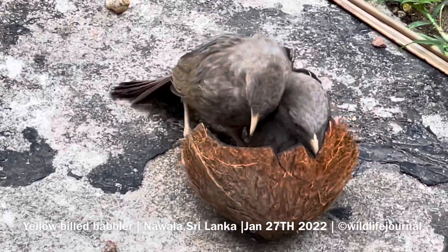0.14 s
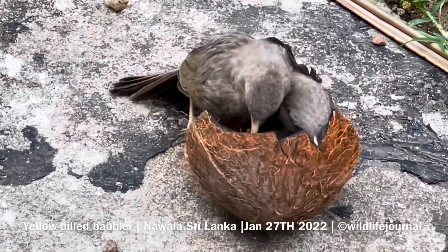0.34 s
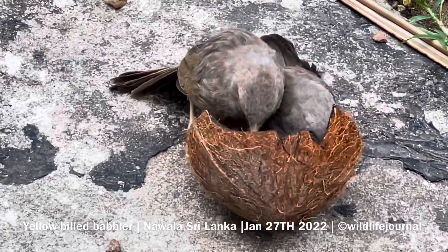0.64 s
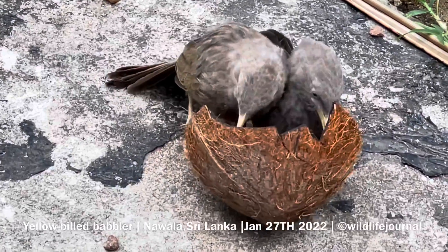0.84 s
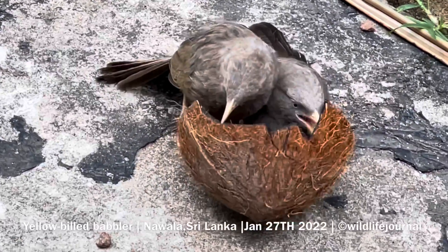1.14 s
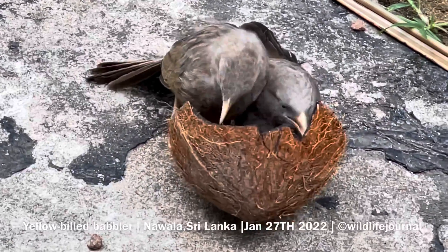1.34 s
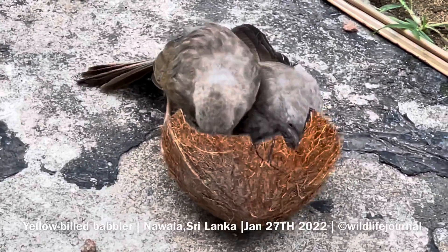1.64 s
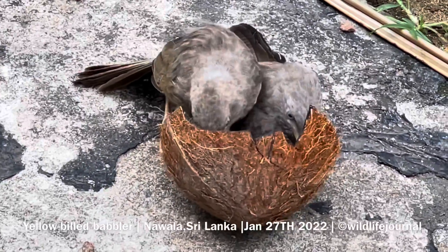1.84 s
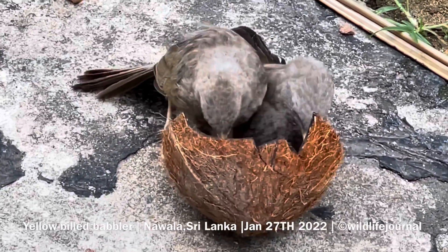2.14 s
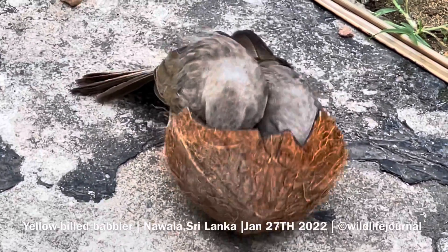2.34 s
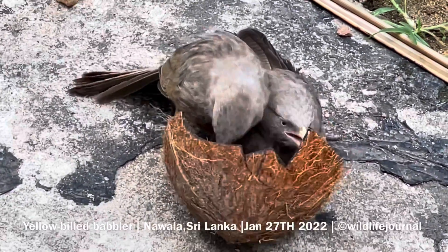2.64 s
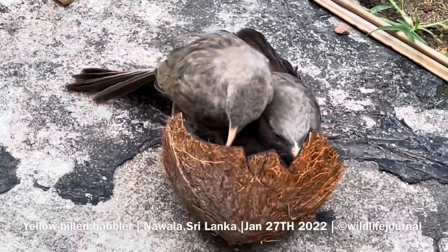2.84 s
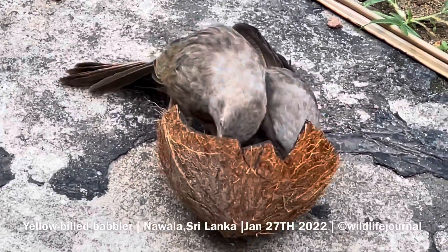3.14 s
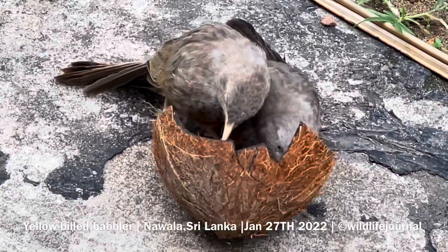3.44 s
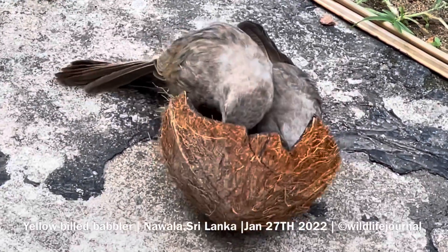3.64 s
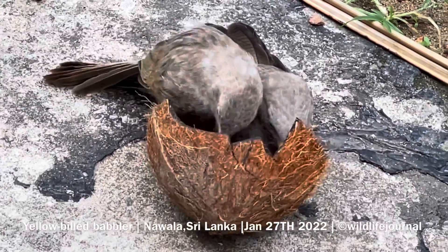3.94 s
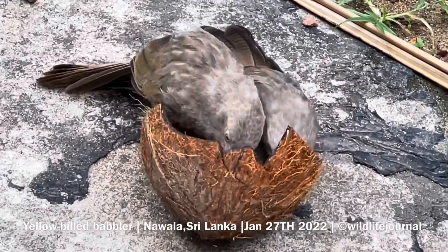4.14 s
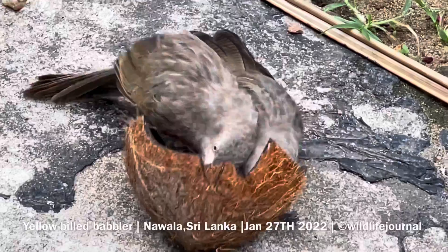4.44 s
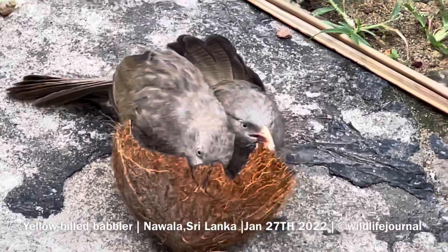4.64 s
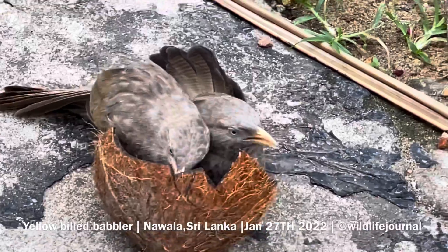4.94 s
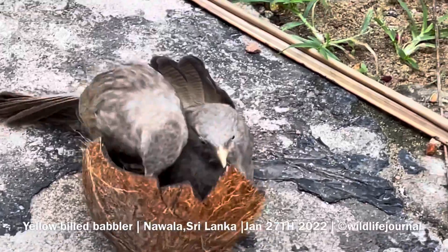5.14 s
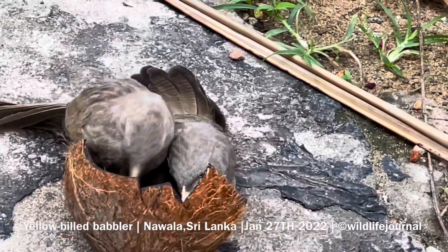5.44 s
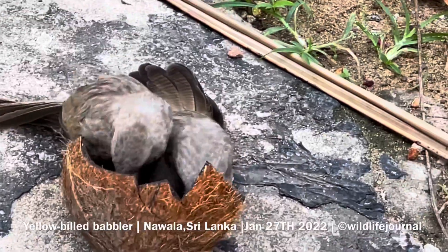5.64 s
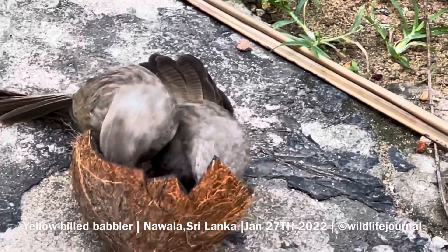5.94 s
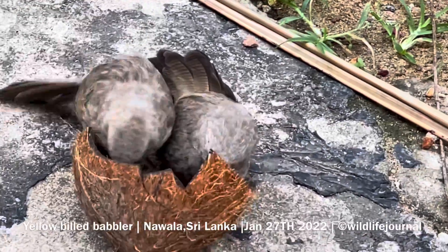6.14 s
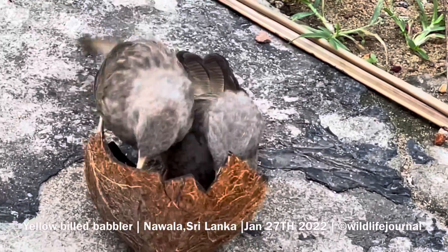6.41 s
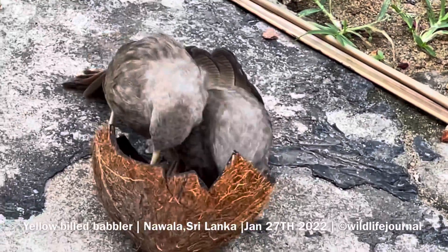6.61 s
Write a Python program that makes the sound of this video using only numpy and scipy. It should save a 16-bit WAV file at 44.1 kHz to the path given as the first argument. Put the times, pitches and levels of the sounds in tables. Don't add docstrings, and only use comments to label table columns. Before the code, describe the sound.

A close stereo outdoor scene in a paved yard, about seven seconds long. Low distant traffic rumbles and hums in soft surges beneath a steady fine hiss of leaves and insects. At 0 to 0.2 seconds a nearby small bird gives brief piercing chirps, with faint hoarse chatter behind. A rough crow caws from the left at 0.7 and 1.4, with short echo. Hollow, dry beak taps on a shell come at 0.9, 1.6 and 2.2 to 2.5, with a crisp gritty tick near 2.55. From 2.7 to 3.2 thin whistles climb, squeak and warble. Single knocks follow at 3.4, 4.1 and 4.4, amid distant bending whistles and husky calls. The loudest near whistle rises at 4.8 and falls sharply by 5.3, two-toned. A third caw comes at 5.6, then a knock at 5.9, small claw scratches around 6.1 to 6.4, and weaker taps at 6.6 and 6.7.

```python
import sys
import numpy as np
from scipy import signal
from scipy.fft import rfft, irfft, next_fast_len
from scipy.io import wavfile

SR = 44100
rng = np.random.default_rng(int(sys.argv[2]) if len(sys.argv) > 2 else 0)


def log_audio(samples):
    frames = np.atleast_2d(samples).T
    limited = np.clip(frames, -1, 1)
    pcm = np.round(limited * 32767).astype(np.int16)
    wavfile.write(sys.argv[1], SR, pcm)


def decibels_to_gain(level_db):
    exponent = np.asarray(level_db, float) / 20
    return 10 ** exponent


N = 298557

# f/Hz, level/dB (per Hz)
TRAFFIC_SPECTRUM = [(14, -46), (24, -9), (54, 1.5), (88, -4), (158, -5.5), (220, -11), (280, -13),
                    (382, -17), (589, -19.5), (665, -23), (819, -22), (1120, -34), (1500, -33.5),
                    (1950, -43), (3300, -120)]
# t/s, rise above the steady hum/dB
HUM_SURGES = [(0.05, 11), (.5, 7), (1.02, 4), (1.45, 8.5), (1.85, 4.5), (2.45, 3), (3.02, 10), (3.45, 8),
              (3.88, -2.5), (4.24, 6), (4.8, 5), (5.4, 6.5), (6.66, 6)]
# f/Hz, level/dB (per Hz)
HISS_SPECTRUM = [(590, -12), (1000, 1), (1170, -4), (2740, -9.5), (5060, -29.5), (5690, -20), (6330, -4.5),
                 (6610, 0.5), (7440, -19.5), (9220, -8), (9830, -6), (10400, -15.5), (10800, -19),
                 (11600, -22.5), (13000, -33), (14500, -55)]
# t/s, level change/dB
BREEZE = [(0, -1.5), (1.9, 2), (2.2, -0.5), (3.0, 3), (3.7, -1), (4.8, -2), (6.3, 0), (6.77, -3)]
# f/Hz, likeness/1
LIKENESS = [(60, 0.93), (130, 0.88), (290, 0.87), (640, 0.27), (1400, 0.27), (3100, 0.94), (6000, 0.996)]
# t/s, f/Hz, level/dB, octave level/dB as the beak opens
UPPER_NOTES = [
    [(0.092, 4040, -47, -71), (0.1, 4180, -42.5, -61), (0.136, 3960, -39, -50.5), (0.152, 3780, -40.5, -48),
     (0.18, 3405, -36.5, -60), (0.214, 3725, -40, -50), (0.23, 3820, -42, -51), (0.237, 3800, -57, -54)],
    [(2.68, 3820, -56, -81), (2.696, 3966, -51, -61), (2.746, 4003, -47, -74), (2.794, 4318, -42, -57),
     (2.834, 4200, -42, -46), (2.86, 4300, -45.5, -38.5), (2.874, 4100, -43, -58), (2.89, 4010, -48, -91)],
    [(3.028, 3770, -42, -59), (3.034, 4055, -49, -54), (3.042, 4013, -42.5, -53), (3.06, 3690, -44, -68),
     (3.074, 3780, -44, -56), (3.098, 4040, -44, -57), (3.106, 3900, -48, -64)],
    [(4.818, 4050, -63, -69), (4.828, 4075, -51.5, -67), (4.86, 4123, -43.5, -50.5),
     (4.872, 4100, -41, -61), (4.91, 4097, -43, -47), (4.958, 4163, -32.5, -49), (5.0, 4386, -32.5, -40),
     (5.012, 4390, -38, -50)],
    [(5.102, 4150, -52, -61), (5.114, 4244, -42.5, -48.5), (5.156, 3960, -35.5, -49.5),
     (5.186, 3843, -32, -49), (5.19, 3797, -35, -53), (5.21, 3740, -32, -55), (5.222, 3810, -33, -68),
     (5.228, 3660, -63, -62)],
]
# t/s, f/Hz, level/dB, octave level/dB
SQUEAKS = [
    [(0.0, 4370, -37, -49), (0.008, 3870, -61, -69), (0.014, 3600, -47, -55)],
    [(2.891, 4840, -46, -46), (2.9, 4680, -61, -44), (2.912, 4490, -53, -48), (2.932, 4430, -46.5, -44),
     (2.941, 4100, -47, -52), (2.95, 3340, -55, -70)],
    [(3.132, 3735, -50, -69), (3.138, 3710, -40.5, -65), (3.147, 3460, -45, -58), (3.153, 3250, -51, -63),
     (3.16, 3450, -51, -64), (3.17, 3550, -52, -73)],
    [(5.0125, 4160, -35, -50), (5.017, 3830, -49.5, -57), (5.023, 3430, -67, -79)],
]
# t/s, f/Hz, level/dB, octave level/dB
LOWER_NOTES = [
    [(0.194, 2370, -58, -104), (0.202, 2478, -43, -77), (0.216, 2463, -47.5, -63), (0.224, 2507, -38, -71),
     (0.228, 2490, -68, -83), (0.234, 2476, -67, -82)],
    [(3.032, 2356, -51, -97), (3.042, 2423, -45.5, -66), (3.056, 2330, -47, -70), (3.066, 2403, -41.5, -69),
     (3.078, 2474, -42.5, -68), (3.092, 2553, -34.5, -56), (3.104, 2527, -36.5, -66),
     (3.114, 2475, -38.5, -49), (3.128, 2570, -30.5, -57), (3.137, 2640, -59, -44)],
    [(5.218, 2560, -72.5, -76), (5.226, 2695, -28, -43), (5.232, 2610, -28, -49.5),
     (5.252, 2575, -30.5, -45), (5.264, 2540, -39, -47.5), (5.272, 2410, -39.5, -58)],
]
# start t/s, end t/s, level/dB
DOUBLING = [(2.685, 2.711, -64), (2.754, 2.806, -53), (2.803, 2.847, -62), (5.166, 5.225, -62.5)]
# upper multiple/1, lower multiple/1, level/dB
MIXED_TONES = [(1, -1, -24), (1, 1, -18), (2, -1, -25), (1, 2, -8), (2, 1, -8), (2, 2, -30), (2, 3, -40)]
# start t/s, crest t/s, end t/s, crest f/Hz, level/dB
FAR_ARCHED = [(1.141, 1.402, 1.49, 3840, -69.5), (2.41, 2.613, 3.14, 3952, -68),
              (5.79, 6, 6.3, 4098, -68.5)]
# t/s, f/Hz, level/dB
FAR_CURVED = [
    [(4.255, 3660, -70), (4.3, 3700, -72.5), (4.36, 3765, -66), (4.43, 3900, -66), (4.51, 4085, -71),
     (4.59, 3560, -61.5), (4.68, 3380, -63), (4.81, 3433, -80)],
    [(4.245, 2950, -66), (4.285, 2465, -61), (4.32, 2324, -62), (4.343, 2350, -66), (4.356, 2380, -70)],
    [(4.59, 2850, -66), (4.63, 2456, -60), (4.662, 2360, -62), (4.682, 2350, -61)],
]
# start t/s, end t/s, first f/Hz, last f/Hz, level/dB
FAR_STRAIGHT = [(0.001, .11, 4610, 4840, -67), (2.76, 2.89, 4800, 4730, -72), (0.292, 0.686, 905, 943, -70),
                (0.619, .72, 3530, 3500, -82), (1.03, 1.143, 3130, 3010, -76),
                (1.129, 1.433, 3006, 2834, -67.5), (1.486, 1.66, 3610, 3566, -68.5),
                (2.76, 2.863, 3570, 3500, -62.5), (3.566, 3.67, 3330, 3360, -68),
                (3.808, 3.83, 2560, 2560, -68), (3.85, 3.895, 2517, 2600, -61),
                (3.923, 4.096, 3058, 3006, -65), (2.455, 2.5, 3130, 3170, -68.5),
                (4.328, 4.39, 2073, 2043, -64), (4.664, 4.73, 2080, 2050, -66),
                (3.678, 3.815, 3870, 3950, -92), (6.164, 6.318, 2210, 2260, -74.5)]
# start t/s, end t/s, centre f/Hz, level/dB
HOARSE_CALLS = [(.122, .16, 2600, -63), (.315, .37, 2660, -63.5), (.47, .5, 2203, -67.5),
                (1.82, 1.87, 4240, -74), (1.87, 1.936, 2555, -66.5), (2.44, 2.637, 1636, -71),
                (3.44, 3.67, 2745, -69), (3.91, 4.12, 2775, -77), (4.12, 4.25, 2914, -79.5),
                (2.46, 2.52, 2780, -76), (6.7, 6.76, 2510, -83), (4.26, 4.332, 2750, -72),
                (4.59, 4.66, 2810, -71), (4.686, 4.725, 2795, -63.5), (5.0, 5.015, 2760, -70.5),
                (1.08, 1.4, 3040, -79.5), (6.05, 6.237, 4500, -79.5), (6.2, 6.4, 1603, -76)]
# start t/s, end t/s, centre f/Hz, level/dB
HUSKY_CALLS = [(0.0, 0.037, 9280, -61), (0.002, .03, 4250, -60.5), (.125, .16, 2030, -67),
               (.165, .2, 1795, -69), (.46, .6, 4720, -81), (.62, .7, 1636, -76), (2.471, 2.62, 4670, -97),
               (2.801, 2.826, 2238, -56), (2.83, 3.025, 2250, -69.5), (3, 2.98, 4421, -62),
               (3.134, 3.16, 2880, -63), (3.136, 3.2, 3330, -66), (3.14, 3.152, 2004, -61.5),
               (3.28, 3.39, 1903, -73), (3.36, 3.42, 2720, -77.5), (3.461, 3.62, 8900, -75.5),
               (3.471, 3.6, 2380, -69.5), (3.506, 3.6, 3320, -65), (3.911, 4.09, 2700, -67.5),
               (3.931, 4.1, 6160, -79.5), (3.932, 4.1, 9180, -74.5), (4.101, 4.24, 2980, -79),
               (4.171, 4.25, 4740, -91.5), (5.62, 5.86, 4190, -69.5)]
# start t/s, length t/s, breath level/dB
CAWS = [(0.714, 0.31, -55.5), (1.389, 0.28, -56.5), (5.6, .3, -57)]
# f/Hz, flutter f/Hz, loss on the right/dB of lower and of upper resonance, rasp share/1
CAW_VOICES = [(474.5, 88, 10, 3, .7), (475.5, 87, 17, 3, .55), (470, 85, 7, 1, .95)]
# t/s, level/dB, upper resonance against lower/dB as the beak moves
CAW_EFFORTS = [
    [(0.715, -68, -13), (0.741, -43.5, -16), (0.781, -38.5, -4.5), (0.849, -36.5, -6), (0.865, -42, -1),
     (0.883, -37.5, 3), (0.917, -35.5, -7), (1.01, -54, 5)],
    [(1.395, -62, -7), (1.415, -46.5, -16), (1.439, -42.5, -3.5), (1.481, -32, -13.5), (1.501, -47, -4),
     (1.519, -31, -10), (1.575, -36, -15), (1.623, -36, -11), (1.65, -55.5, -4), (1.68, -39, -1)],
    [(5.605, -83, -15), (5.619, -51, -13), (5.649, -42.5, -4), (5.675, -40.5, -6), (5.771, -39.5, -3),
     (5.785, -49.5, 6), (5.827, -38, -2.5), (5.895, -58, 2.5)],
]
# t/s after its start, level/dB
CAW_ONSET = [(0, -32), (.032, -7), (.078, 1.5)]
# t/s before its end, level/dB
CAW_RELEASE = [(0.082, 2.5), (0.00084, -8.5)]
# f/Hz, level/dB (per Hz)
THROAT_SPECTRUM = [(350, -65), (600, -47), (735, -14), (922, -14), (1030, -9.5), (1170, -3.5), (1440, -1),
                   (1650, 3.5), (1920, 0.5), (2100, 3.5), (2520, -32), (3270, -44), (3580, -50),
                   (4500, -53), (5850, -69), (9900, -120)]
# f/Hz, level/dB (per Hz)
BREATH_SPECTRUM = [(1530, -17), (2600, -3.5), (3270, -12.5), (3720, -10), (4000, -4.5), (8450, -5),
                   (10200, -12), (11300, -5), (12100, -21), (13000, -55)]
# t/s, peak level/dB, f/Hz, left against right/dB
KNOCKS = [(0.939, -40, 800, 1), (1.315, -54.5, 580, -15), (1.613, -45, 1120, -8), (1.877, -51, 800, -2),
          (1.965, -50, 850, 0), (2.495, -51, 744, -1), (2.225, -40.5, 850, 0), (2.451, -40, 716, -1.0),
          (2.516, -51.5, 690, -2), (3.428, -42, 890, 0), (4.079, -41.5, 895, 0), (4.378, -38.5, 910, 1),
          (5.945, -40, 1050, 1), (6.574, -45, 850, 0), (6.73, -50, 800, 1)]
# t/s, peak level/dB, dull part level/dB, decay by 60 dB t/s
TICKS = [(1.322, -54, -60, .02), (1.984, -51, -65, 0.022), (2.229, -49, -57, 0.027),
         (2.255, -47, -50.5, 0.013), (2.269, -44, -47, 0.015), (2.552, -31, -62, 0.02),
         (2.554, -45, -60.5, 0.15), (2.36, -55, -70, .015), (2.57, -45, -66, .02), (2.892, -65, -48, .008),
         (3.134, -68, -43.5, 0.011), (3.6, -68, -63, .015), (4.195, -70, -66, .015), (3.52, -62, -61, 0.05),
         (5.222, -57, -41, 0.013), (5.242, -35, -49, 0.021), (5.946, -57, -57, 0.013),
         (6.088, -43.5, -55.5, 0.11), (6.145, -44, -67, 0.017), (6.185, -42, -62, 0.013),
         (6.234, -49, -75, 0.043), (6.395, -56, -67, 0.023)]
# f/Hz, left lead/rad
PORT_PHASE = [(250, .15), (1500, .45), (5100, .5), (5800, 0), (7100, 0), (7800, .5), (8300, .4), (8600, 0),
              (9700, -2.5), (10300, -3.14), (10900, -3.9), (11700, -6.28), (12250, -6.28), (12700, -7.8)]
# f/Hz, level/dB
MICROPHONE = [(9500, -0.5), (10200, -5.5), (11000, 1.5), (12600, -5), (13300, -22), (14300, -13),
              (15000, -6), (15700, 3), (16200, -34)]


def rms_one(x):
    return x / np.sqrt(np.mean(x ** 2) + 1e-20)


def at_hz(points, hz):
    table_hz, values = np.transpose(points)
    return np.interp(np.log(np.maximum(hz, 1)), np.log(table_hz), values)


def colour(x, spectrum):
    n = x.shape[-1]
    gain = decibels_to_gain(at_hz(spectrum, np.fft.rfftfreq(n, 1 / SR)))
    return rms_one(irfft(rfft(x) * gain, n))


def drift(n, rate_hz):
    r = np.exp(-2 * np.pi * rate_hz / SR)
    noise = rng.standard_normal(n + 8000)
    return rms_one(signal.lfilter([1], [1, -2 * r, r * r], noise)[8000:])


def band(x, low_hz, high_hz):
    return signal.sosfilt(signal.butter(2, [low_hz, high_hz], "band", fs=SR, output="sos"), x)


def turns(hz):
    return 2 * np.pi * np.cumsum(hz) / SR


def spread(n):
    mid, side = rfft(rng.standard_normal((2, n)))
    alike = np.clip(at_hz(LIKENESS, np.fft.rfftfreq(n, 1 / SR)), 0, 1)
    return irfft(np.sqrt(1 + alike) * mid + np.sqrt(1 - alike) * side * [[1], [-1]], n)


def background():
    n = next_fast_len(N)
    t = np.arange(n) / SR
    rumble = decibels_to_gain(-52.5) * colour(spread(n), TRAFFIC_SPECTRUM)
    surge_s, hum_width_hz = 0.13, 9.32
    hum_db = -57 + sum(db * np.exp(-((t - s) / surge_s) ** 2) for s, db in HUM_SURGES)
    hum_phase = turns(75.7 + hum_width_hz / 2 * drift(n, 5.64))
    hum = decibels_to_gain(hum_db) * np.sin(hum_phase) * decibels_to_gain(2.1 * drift(n, 15.0))
    breeze_db = np.interp(t, *np.transpose(BREEZE))
    hiss = decibels_to_gain(-66.5 + breeze_db) * colour(spread(n), HISS_SPECTRUM)
    return (rumble + hum + hiss)[:, :N]


def unfold(rows, fade_s):
    s, *columns = np.transpose(rows)
    at = np.arange(round(s[0] * SR), min(round(s[-1] * SR), N))
    t = at / SR
    since_start = t - s[0] + (at[0] == 0)
    gate = np.clip(np.minimum(since_start, s[-1] - t) / fade_s, 0, 1)
    return at, gate, [np.interp(t, s, c) for c in columns]


def voice(notes, fade_s, wobble, tremble_db, rate_hz):
    out = np.zeros((3, N))
    for rows in notes:
        at, gate, (hz, db, octave_db) = unfold(rows, fade_s)
        out[0, at] = turns(hz * (1 + wobble * drift(len(at), rate_hz)))
        levels_db = np.array([db, octave_db]) + tremble_db * drift(len(at), rate_hz)
        out[1:, at] = np.sqrt(2) * gate * decibels_to_gain(levels_db)
    return out


def tone(phase, height, octave, third_db):
    high = 0
    for k, db in zip(range(3, 7), [1.5, 1.0, -10, -20]):
        ragged = 0.51 + 0.88 * drift(N, 170.0)
        high = high + decibels_to_gain(db) * ragged * np.sin(k * phase)
    firm = height * np.sin(phase) + octave * np.sin(2 * phase)
    return firm + decibels_to_gain(third_db) * np.sqrt(height * octave) * high


def near_birds():
    upper = voice(UPPER_NOTES, 0.0019, wobble=0.004, tremble_db=0.5, rate_hz=45.0)
    upper = upper + voice(SQUEAKS, 0.0025, wobble=0.009, tremble_db=3.0, rate_hz=280.0)
    lower = voice(LOWER_NOTES, 0.002, wobble=0.003, tremble_db=1.0, rate_hz=80.0)
    slips = [[(start, 1, db, db), (end, 1, db, db)] for start, end, db in DOUBLING]
    doubling = voice(slips, 0.0068, wobble=0.001, tremble_db=4.5, rate_hz=58.0)[1]
    under = doubling * (np.sin(upper[0] / 2) + decibels_to_gain(-10.5) * np.sin(3 * upper[0] / 2))
    both = np.sqrt(upper[1] * lower[1])
    lower_drive = lower[1] / decibels_to_gain(-38.0) + 1e-9
    mixed = 0
    for m, n, db in MIXED_TONES:
        height = decibels_to_gain(db + 3.7 * drift(N, 56.0)) * both
        height = height * lower_drive ** (0.5 * (abs(n) - 1))
        mixed = mixed + height * np.sin(m * upper[0] + n * lower[0])
    breathy = 1 + 0.015 * drift(N, 380.0)
    return breathy * (tone(*upper, third_db=-27.5) + tone(*lower, third_db=-14.5) + under + mixed)


def yard(x, dull_hz):
    t = np.arange(round(1.2 * SR)) / SR
    decay = decibels_to_gain(-60 * t / 0.57) + 1.2 * decibels_to_gain(-60 * t / 0.12)
    tail = spread(len(t)) * decay * np.clip(t / 0.011, 0, 1)
    tail = signal.sosfilt(signal.butter(1, dull_hz, fs=SR, output="sos"), tail)
    return signal.fftconvolve(x[None], tail / np.sqrt(np.sum(tail ** 2) / 2), axes=1)[:, :N]


def arch(start, crest, end, hz, db):
    rise_hz_per_s, fall_s, fall_share = 2100, 0.098, 0.885
    first_hz = max(hz - rise_hz_per_s * (crest - start), fall_share * hz)
    knee = min(crest + fall_s, end - 0.01)
    low_hz = hz * (1 - (1 - fall_share) * (knee - crest) / fall_s)
    last_db = db - 66 * (end - knee)
    rows = [(start, first_hz, db - 10.5), (crest, hz, db), (knee, low_hz, db), (end, low_hz, last_db)]
    return [(s, f, level, level - 4.5) for s, f, level in rows]


def curved(rows):
    return [(s, hz, db, db + (-10 if hz > 3200 else -32)) for s, hz, db in rows]


def straight(start, end, first_hz, last_hz, db):
    last_db = db - 5.5 - 50 * (last_hz - first_hz) / 1000
    top_db = max(last_db - db, 0)
    rows = [(start, first_hz, db - 1), (start + 0.017, first_hz, db), (end, last_hz, last_db)]
    return [(s, f, level - top_db, level - top_db - 32) for s, f, level in rows]


def far_whistles():
    arched = voice([arch(*row) for row in FAR_ARCHED], 0.019, wobble=0.01916, tremble_db=3.0, rate_hz=98.0)
    whistles = tone(*arched, third_db=-36)
    for rows in FAR_CURVED:
        bent = voice([curved(rows)], 0.006, wobble=0.0099, tremble_db=4.0, rate_hz=94.0)
        whistles = whistles + tone(*bent, third_db=-37)
    soft = voice([straight(*row) for row in FAR_STRAIGHT], 0.0074, wobble=0.016, tremble_db=4.0, rate_hz=71.0)
    return whistles + tone(*soft, third_db=-42)


def chatter(calls, scatter):
    out = np.zeros(N)
    for start, end, hz, db in calls:
        at = np.arange(round(start * SR), round(end * SR))
        swell = np.sin(np.pi * np.linspace(0, 1, len(at)) ** 0.5) ** 0.11
        wander = drift(16000, 263.0)[:len(at)]
        throb = drift(16000, 140.0)[:len(at)]
        out[at] += swell * decibels_to_gain(db + 4.5 + 4.9 * throb) * np.sin(turns(hz * (1 + scatter * wander)))
    return out


def far_chatter():
    return chatter(HOARSE_CALLS, 0.131) + chatter(HUSKY_CALLS, 0.0452)


def caw_shape(start, length, breath_db):
    rows = [(start + s, db) for s, db in CAW_ONSET]
    rows += [(start + length - s, db) for s, db in CAW_RELEASE]
    return np.array(rows) + [0, breath_db]


def caw_source(n, hz, flutter_hz, rasp):
    t = np.arange(n) / SR
    glide = 1 - 0.11 * np.exp(-t / 0.0345) - 0.07 * np.exp((t - t[-1]) / 0.0499)
    beat = turns(flutter_hz * (1 + 0.057 * drift(n, 11.5)))
    depth = 0.2 * decibels_to_gain(1.5 * drift(n, 10))
    phase = turns(hz * glide * (1 + 0.003 * drift(n, 11.7))) + depth * np.sin(beat)
    partials = 0
    for k in range(1, 10):
        height = 0.35 if k == 2 else 1
        partials = partials + height * np.cos(k * phase + k * k + 0.22 * drift(n, 30.0))
    fluttering = rms_one(partials * (1 + 0.25 * np.cos(beat + 0.35)))
    hoarser = 1 + 2.5 * np.linspace(-1, 1, n) ** 4
    return fluttering + rasp * hoarser * rng.standard_normal(n)


def crow():
    out = np.zeros((2, N))
    for caw, effort, caw_voice in zip(CAWS, CAW_EFFORTS, CAW_VOICES):
        hz, flutter_hz, low_loss_db, high_loss_db, rasp = caw_voice
        at, gate, (breath_db,) = unfold(caw_shape(*caw), 0.011)
        n = len(at)
        effort_s, *columns = np.transpose(effort)
        db, beak_db = [np.interp(at / SR, effort_s, c) for c in columns]
        shaped = rfft(colour(caw_source(n, hz, flutter_hz, rasp), THROAT_SPECTRUM))
        low = 1 / (1 + (np.fft.rfftfreq(n, 1 / SR) / 1680) ** 20)
        for share, level_db, loss_db in [(low, db, low_loss_db), (1 - low, db + beak_db, high_loss_db)]:
            voiced = np.zeros(N)
            voiced[at] = gate * decibels_to_gain(level_db) * rms_one(irfft(shaped * share, n))
            out += voiced * decibels_to_gain(np.array([[2.2], [0.6 - loss_db]]))
            out += decibels_to_gain(-5.5) * yard(voiced, 4400) * decibels_to_gain(np.array([[1.5], [-1.5]]))
        breath = np.zeros(N)
        breath[at] = gate * decibels_to_gain(breath_db) * colour(rng.standard_normal(n), BREATH_SPECTRUM)
        out += breath + decibels_to_gain(-1.0) * yard(breath, 10000)
    return out


def knocks():
    out = np.zeros((2, N))
    t = np.arange(2600) / SR
    for s, db, hz, pan_db in KNOCKS:
        low_mode = np.sin(2 * np.pi * hz * t) * decibels_to_gain(-60 * t / 0.021)
        high_mode = 1.24 * np.sin(2 * np.pi * 1.32 * hz * t) * decibels_to_gain(-60 * t / 0.0099) * decibels_to_gain(-60 * t / 0.021)
        tap = band(rng.standard_normal(len(t)) * decibels_to_gain(-60 * t / 0.049), 1530, 4000)
        sides = decibels_to_gain(db + np.array([[0.5], [-0.5]]) * pan_db)
        i = round(s * SR)
        out[:, i:i + len(t)] += (sides * (low_mode + high_mode + 0.14 * tap))[:, :N - i]
    return out


def ticks():
    out = np.zeros(N)
    t = np.arange(2600) / SR
    for s, db, dull_db, t60_s in TICKS:
        noise = rng.standard_normal(len(t)) * decibels_to_gain(-60 * t / t60_s)
        bright = band(band(noise, 9800, 11600), 9300, 14000) + 0.39 * band(noise, 6600, 8200)
        fizz = decibels_to_gain(db + 19) * band(noise * decibels_to_gain(-60 * t / 0.02), 13000, 16000)
        dull = decibels_to_gain(dull_db + 6.0) * band(noise, 1300, 7100)
        i = round(s * SR)
        out[i:i + len(t)] += decibels_to_gain(db) * (bright + fizz) + dull
    return out


def scene():
    near, whistles, hoarse = near_birds(), far_whistles(), far_chatter()
    direct = near * decibels_to_gain(np.array([[-0.3], [0.3]])) + decibels_to_gain(-5) * whistles + hoarse
    echo = yard(decibels_to_gain(-14.5) * near + decibels_to_gain(3.0) * whistles + decibels_to_gain(-3.0) * hoarse, 18400)
    return background() + direct + echo + crow() + knocks() + ticks()


def band_limit(x):
    return signal.sosfilt(signal.butter(12, 15710, fs=SR, output="sos"), x)


def record(dry):
    n = next_fast_len(N)
    hz = np.fft.rfftfreq(n, 1 / SR)
    turn = np.exp(0.5j * at_hz(PORT_PHASE, hz) * np.array([[1], [-1]]))
    gain = decibels_to_gain(at_hz(MICROPHONE, hz))
    mix = irfft(rfft(dry, n) * turn * gain, n)[:, :N]
    return band_limit(mix)


dry = scene()
out = record(dry)
log_audio(out)
```